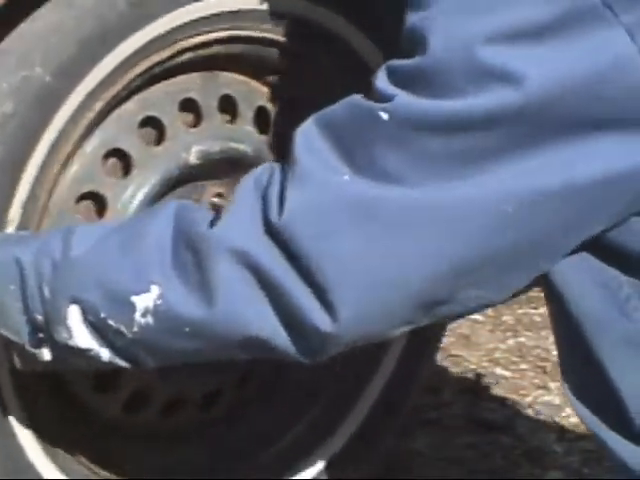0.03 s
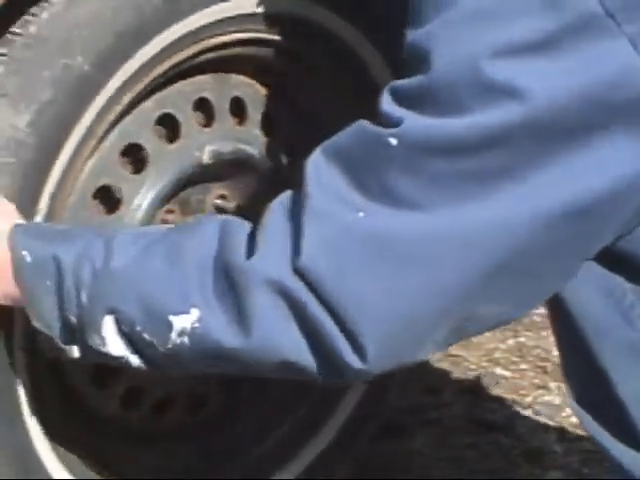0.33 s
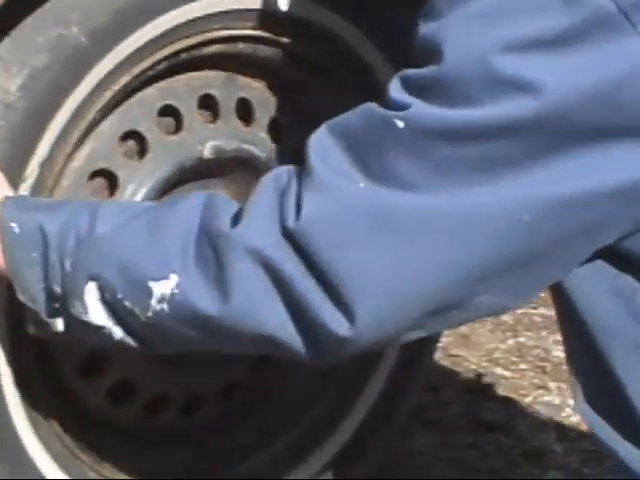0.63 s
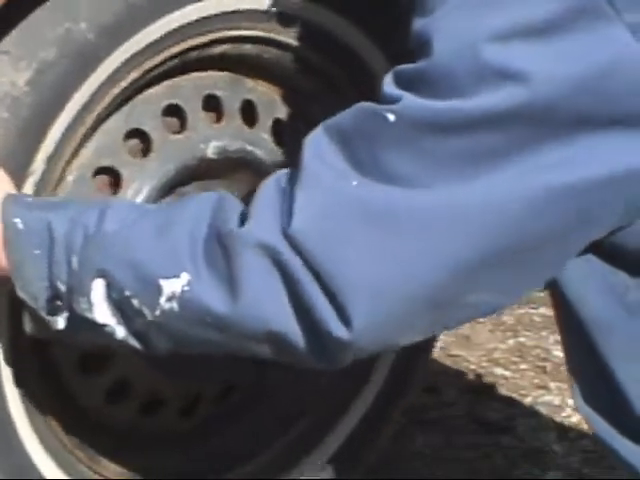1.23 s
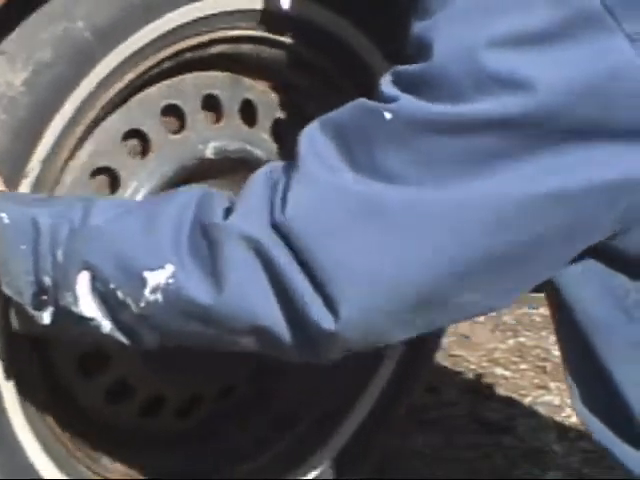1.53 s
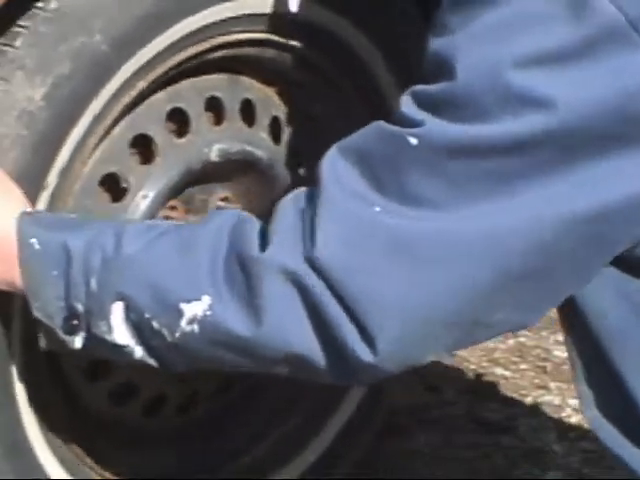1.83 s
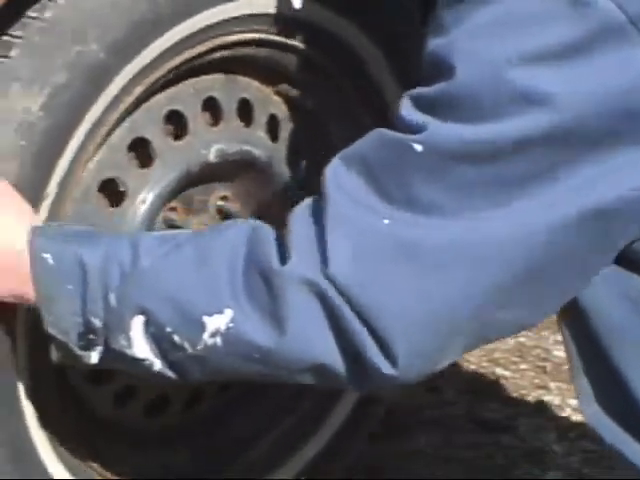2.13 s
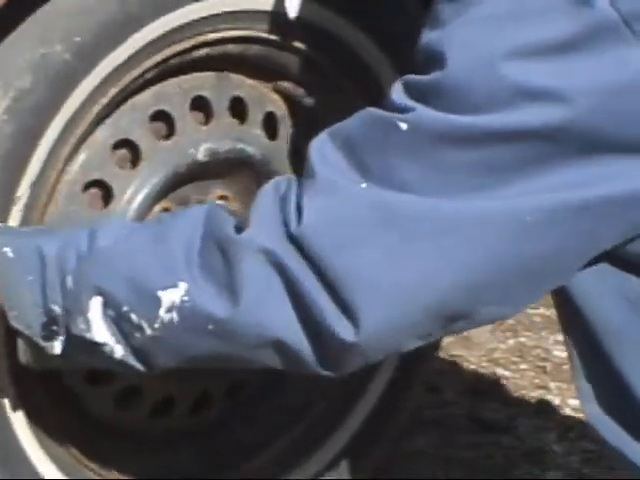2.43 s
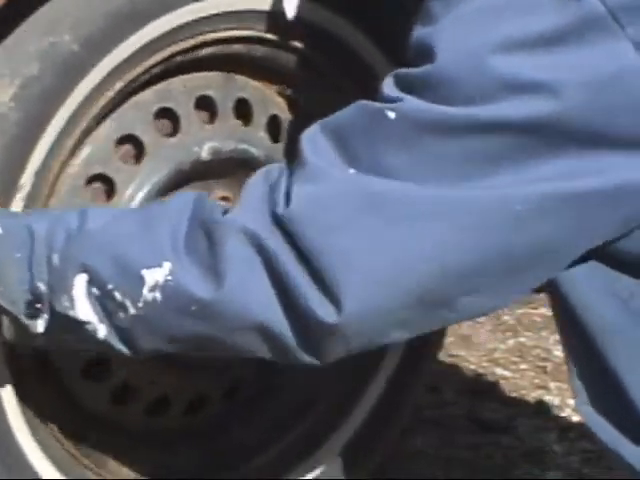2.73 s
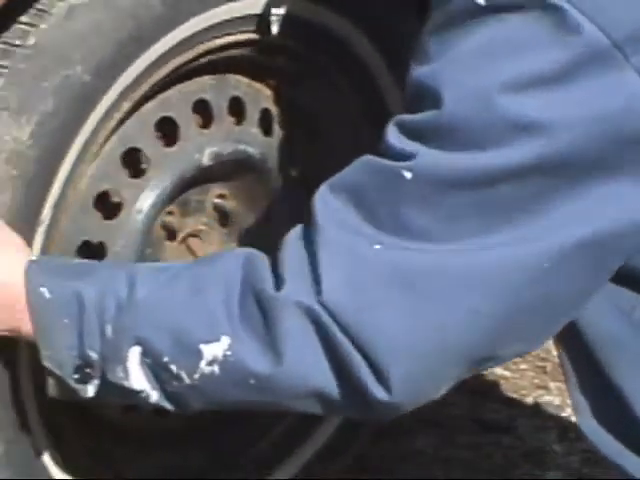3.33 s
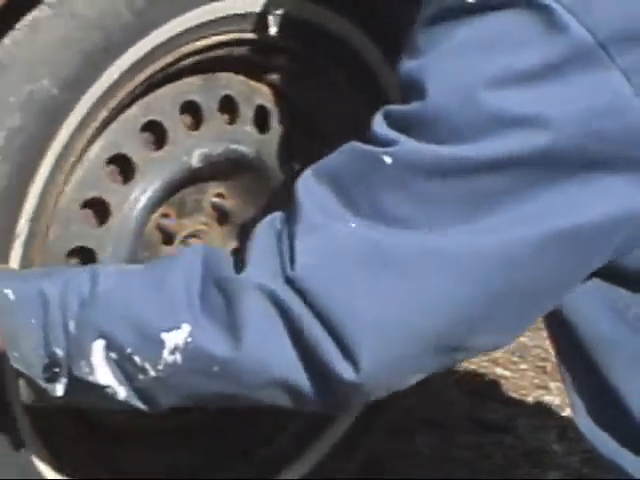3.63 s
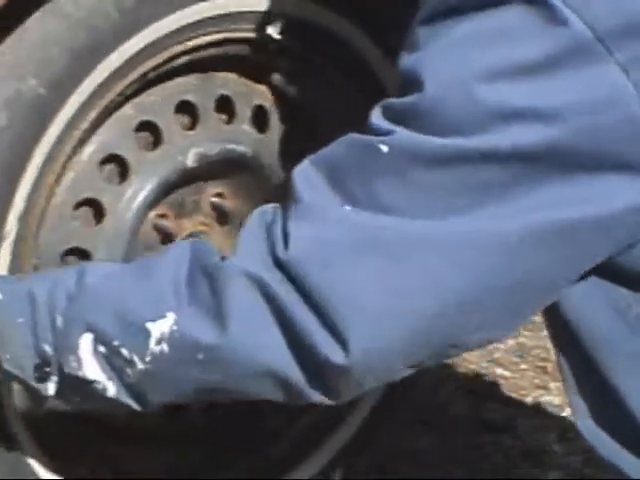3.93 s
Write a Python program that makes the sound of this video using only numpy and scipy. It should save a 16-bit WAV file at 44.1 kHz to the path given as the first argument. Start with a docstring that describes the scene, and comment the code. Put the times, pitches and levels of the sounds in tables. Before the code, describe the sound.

Close metallic clanks come from a wrench worked back and forth on a car wheel. After an opening clank and a quieter moment with soft bumps, hard strokes alternate with lighter return taps above a quiet outdoor rumble.

```python
"""A steel wrench is worked back and forth on the nuts of a car wheel, close by, over an outdoor rumble.
First it taps as it takes up its slack, then clanks home: steel clashes, the tyre thuds, the wheel rings.
A quieter moment follows, with soft bumps and the rub of a sleeve. After about a second the clanks come
hard and often, up to the end, and a loose nut pings on some return strokes. The car and the yard
scatter each blow, and the hardest blows overload the recorder."""
import sys
import numpy as np
from scipy import signal
from scipy.fft import rfft, irfft
from scipy.io import wavfile
from scipy.ndimage import map_coordinates

SR = 44100
rng = np.random.default_rng(int(sys.argv[2]) if len(sys.argv) > 2 else 0)


def bounce(signal):
    """Save signal as a 16-bit WAV file at the path given by the first command-line argument."""
    frames = np.transpose(np.atleast_2d(signal))
    limited = np.clip(frames, -1, 1)
    pcm = np.round(limited * 32767).astype(np.int16)
    wavfile.write(sys.argv[1], SR, pcm)


N = 176400
AGE = np.arange(int(.7 * SR)) / SR  # seconds since a blow began


# Each row: start in seconds, wrench level in dB, wrench pitch in Hz, then clash, thud and wheel in dB.
CLANK_HITS = [(0.062, -6, 1640, -11.5, -25.5, -48), (0.079, -12, 1573, -13, -29.5, -55),
              (0.684, -16.5, 1728, -17.5, -28, -53), (1.1725, 0, 1621, -3.5, -24.5, -40.5),
              (1.435, -7.5, 1667, -17, -22.5, -50), (1.618, -17.5, 1557, -12, -20.5, -46.5),
              (1.825, 0.5, 1713, -7.5, -17, -42.5), (2.028, -20, 1660, -11.5, -23, -40),
              (2.036, -23, 1620, -16, -25, -49), (2.239, 0, 1621, -6.5, -17.5, -40.5),
              (2.396, 0.5, 1599, -7.5, -26, -56), (2.409, -6.5, 1652, -7.5, -22, -37),
              (2.416, -8, 1574, -21, -27.5, -46), (2.65, -0.5, 1626, -6.5, -14.5, -57),
              (2.804, -11, 1567, -8.5, -21, -42), (3.02, 1, 1688, -7.5, -16, -41),
              (3.196, -9.5, 1618, -11, -23, -44.5), (3.405, 1.5, 1634, -7, -14, -38.5),
              (3.414, -3.5, 1698, -8, -23, -60), (3.585, 1, 1612, -5, -17.5, -70),
              (3.609, -21, 1700, -12.5, -30, -36.5), (3.794, -2, 1623, -9.5, -16.5, -66),
              (3.801, 1.5, 1665, -6.5, -19.5, -36), (3.965, 1.5, 1622, -6, -19, -40),
              (3.991, -9, 1580, -17, -19, -45)]

def clanks(graze_lead_s=.0045, graze_db=-16):
    """The wrench slams home and shakes the socket, tyre and wheel; the socket grazes the nut just before."""
    out = np.zeros(N)
    for start, wrench_db, hz, clash_db, thud_db, wheel_db in CLANK_HITS:
        add(out, undb(clash_db + graze_db) * clash(), start - graze_lead_s)
        add(out, undb(wrench_db) * wrench(hz), start)
        contact = clash() + undb(-19) * squeak() + undb(-20.5) * rebounds()
        add(out, undb(clash_db) * contact, start)
        add(out, undb(thud_db) * knock(), start)
        add(out, undb(wheel_db) * wheel(), start)
    return out


# Each row: start in seconds, level in dB, wrench pitch in Hz.
TAP_HITS = [(0.05, -4.5, 1670), (0.074, -3, 1644), (0.089, -12, 1620), (0.954, -29, 1627),
            (0.974, -31.5, 1550), (1.156, -1.5, 1601), (1.595, -9.5, 1630), (1.63, -15, 1630),
            (1.838, -15, 1744), (2.004, -8.5, 1637), (2.61, -19.5, 1585), (2.622, -18, 1690),
            (2.635, -24.5, 1567), (2.782, -18.5, 1540), (2.831, -18.5, 1583), (3.171, -18, 1612),
            (3.225, -15.5, 1632), (3.556, -12.5, 1603)]

def taps():
    """The wrench taps lightly as it takes up its slack."""
    out = np.zeros(N)
    for start, db, hz in TAP_HITS:
        contact = undb(-15) * clash() + undb(-25.5) * squeak()
        tap = wrench(hz) + contact + undb(-28) * knock()
        add(out, undb(db) * tap, start)
    return out


# The wrench's tones. Each row: multiple of its pitch, level in dB, fade time in seconds.
WRENCH_TONES = [(.83, -16.5, 0.094), (.93, -12, 0.088), (.965, 2, 0.038), (1.03, 3, 0.052),
                (1.1, -19, 0.064), (1.59, -13, 0.02), (1.635, -37, 0.02), (3.02, -16, 0.012)]

def wrench(hz, rise_s=.005):
    """The struck wrench bends and rings; tones close in pitch make the sound waver."""
    swell = 1 - np.exp(-(AGE / rise_s) ** 2)
    return ring(WRENCH_TONES, hz, scatter_db=1.2, detune=.006) * swell


# Where clashing steel rings. Each row: pitch in Hz, width in Hz, level in dB.
CLASH_BANDS = [(570, 1100, -10), (1003, 44, -6), (1405, 224, 4.5), (1622, 78, 11), (1828, 131, 8),
               (2643, 101, 11), (2907, 76, 5.5), (3200, 300, -4), (3776, 81, 4), (4020, 190, -1),
               (4858, 197, 0), (5107, 275, -0.5), (5500, 2900, -15.5), (8330, 320, -17.5),
               (13400, 12000, -23.5)]

def clash(scatter_db=2):
    """Steel hits steel; each contact lands somewhere else and brings out other pitches."""
    bands = [(hz, width, db + scatter_db * rng.standard_normal()) for hz, width, db in CLASH_BANDS]
    return chatter(bands, fade_s=.046)


# The socket's squeaks. Each entry: pitch in Hz.
SQUEAK_HZ = [9480, 10420, 13770, 14780]
# One row for each pitch above. Each row: width in Hz, level in dB.
SQUEAK_BANDS = [(170, -2.5), (131, 2.5), (120, 3), (170, -0.5)]

def squeak():
    """The socket, the cup that grips the nut, gives a thin, high ring."""
    bands = [(hz, width, db) for hz, (width, db) in zip(SQUEAK_HZ, SQUEAK_BANDS)]
    return chatter(bands, fade_s=.057)


def rebounds(count=3, min_gap_s=.0073, spread_s=.013):
    """The loose socket rattles on its nut after a clank, each contact weaker than the last."""
    out = np.zeros(N)
    gaps = min_gap_s + spread_s * rng.random(count)
    for k, delay in enumerate(np.cumsum(gaps)):
        add(out, clash() / (k + 1), delay)
    return out[:len(AGE)]


# The wheel disc's broad knock. Each row: pitch in Hz, width in Hz, level in dB.
DISC_BANDS = [(204, 64, 3.5), (324, 190, -5.5), (680, 1900, -12), (963, 98, -5.5)]

def knock():
    """The tyre thuds under the rough knock of the wheel disc."""
    return tyre() + undb(-4.5) * chatter(DISC_BANDS, fade_s=.19)


# The tyre's tones. Each row: pitch in Hz (played 1% lower), level in dB, fade time in seconds.
TYRE_TONES = [(123.5, -20, 0.38), (161.5, -6.5, 0.42), (180, -8, 0.27), (210.5, -7, 0.25),
              (236.6, -9.5, 0.25), (303.6, -9, 0.18), (349.7, -12, 0.08)]

def tyre(rise_s=.0016):
    """The shaken tyre gives a dull thud made of low tones."""
    swell = 1 - np.exp(-AGE / rise_s)
    return ring(TYRE_TONES, pitch=.99, scatter_db=3, detune=.022) * swell


# The wheel's tones. Each entry: pitch in Hz.
WHEEL_TONE_HZ = [1735, 2625, 3525, 4699, 5450]
# One row for each pitch above. Each row: level in dB, fade time in seconds.
WHEEL_TONES = [(11, 0.28), (-14, 0.44), (3, 0.49), (-0.5, 0.36), (2.5, 0.15)]

def wheel():
    """The steel wheel rings on after a clank."""
    tones = [(hz, db, fade_s) for hz, (db, fade_s) in zip(WHEEL_TONE_HZ, WHEEL_TONES)]
    return ring(tones, scatter_db=2.5)


# Each row: start in seconds, level in dB.
PING_HITS = [(1.62, -27.5), (2.804, -29), (3.195, -32)]

def nut_pings(hz=4027, fade_s=.18):
    """A loose nut pings with one clear tone on some return strokes."""
    out = np.zeros(N)
    for start, db in PING_HITS:
        add(out, ring([(hz, db, fade_s)]), start)
    return out


# Each row: start in seconds, level in dB, pitch in Hz.
SOCKET_SCRAPES = [(0.04, -24, 1306), (0.049, -20, 2700), (2.389, -20, 1380), (2.393, -17, 2630),
                  (2.614, -31, 2600), (2.898, -32, 1684), (2.905, -34, 780)]

def scrapes(width_ratio=.072):
    """The socket scrapes briefly as it shifts on its nut."""
    out = np.zeros(N)
    for start, db, hz in SOCKET_SCRAPES:
        add(out, undb(db) * chatter([(hz, width_ratio * hz, 0)], fade_s=.05), start)
    return out


# Each row: start in seconds, level in dB.
TYRE_BUMPS = [(0.094, -24.5), (.356, -29.5), (0.694, -33.5), (.965, -27), (1.237, -29), (1.493, -26.5),
              (2.483, -25), (3.247, -26)]

def bumps(rise_s=.0054):
    """The tyre is bumped softly, so its thud starts more gently."""
    out = np.zeros(N)
    swell = 1 - np.exp(-AGE / rise_s)
    for start, db in TYRE_BUMPS:
        add(out, undb(db) * tyre() * swell, start)
    return out


# The echo's tone colour. Each row: frequency in Hz, level in dB.
ECHO_COLOUR = [(60, -55), (170, -10), (350, 6.5), (800, -1.5), (1700, -5), (3000, -10.5), (6000, -4.5),
               (15000, -4)]

def yard_echo(sound, delay_s=.0013, build_s=.01):
    """Sound bounces off the car, the ground and nearby walls and blurs into a short echo."""
    build = 1 - np.exp(-np.maximum(AGE - delay_s, 0) / build_s)
    tail = rng.standard_normal(len(AGE)) * fade(fade_s=.3) * build
    tail /= np.linalg.norm(tail)
    size = 2 * len(AGE)
    gain = colour(ECHO_COLOUR, np.fft.rfftfreq(size, 1 / SR))
    tail = irfft(rfft(tail, size) * gain)[:len(AGE)]
    return undb(-14.5) * signal.fftconvolve(sound, tail)[:N]


# Each row: time in seconds, rasp level in dB, hiss level in dB, number that multiplies both pitches.
SLEEVE_PATH = [(0.761, -61, -67, 1.09), (1.0, -49, -55, 0.96), (1.13, -52, -59, 1.02),
               (1.4, -62, -55, 1.08), (1.6, -71, -71, 1.2)]

def sleeve():
    """A sleeve rubs on the tyre with a faint rasp and hiss that slide in pitch."""
    times, *columns = np.array(SLEEVE_PATH).T
    rasp_db, hiss_db, pitch = (np.interp(np.arange(N) / SR, times, column) for column in columns)
    out = np.zeros(N)
    for db, base_hz, width_hz in [(rasp_db, 2820, 210), (hiss_db, 4850, 560)]:
        rub = band_noise([(base_hz, width_hz, 0)], N)
        out += undb(db) * map_coordinates(rub, [np.cumsum(pitch)], mode="wrap")  # faster sounds higher
    return out


# The rumble's tone colour. Each row: frequency in Hz, level in dB.
RUMBLE_COLOUR = [(15, -33), (25, -3.5), (173, 6.5), (340, -1), (378, -3), (457, -2.5), (614, -2.5),
                 (1240, -5.5), (2630, -11.5), (2920, -14), (3930, -14.5), (7700, -19), (15500, -24)]

def rumble():
    """The outdoors hums along as a quiet, steady, low noise."""
    gain = colour(RUMBLE_COLOUR, np.fft.rfftfreq(N, 1 / SR))
    return undb(-44.5) * noise(gain, N)


def ring(tones, pitch=1, scatter_db=0, detune=0):
    """A struck object's fading tones; scatter_db varies their level and detune their pitch."""
    out = np.zeros(len(AGE))
    for k, (frequency, db, fade_s) in enumerate(tones):
        level = undb(db + scatter_db * rng.standard_normal())
        hz = frequency * pitch * (1 + detune * rng.standard_normal())
        out += (-1) ** k * level * fade(fade_s) * np.sin(2 * np.pi * hz * AGE)  # every other tone flips
    return out


def chatter(bands, fade_s, rise_s=.004):
    """Steel faces grind together for an instant and leave a short, noisy ring."""
    swell = np.minimum(AGE / rise_s, 1) ** 1.5
    decay = np.exp(-np.log(1000) * np.maximum(AGE - rise_s, 0) / fade_s)
    return band_noise(bands, len(AGE)) * swell * decay


def band_noise(bands, size):
    """Noise that is strongest around each band's pitch."""
    hz = np.fft.rfftfreq(size, 1 / SR)
    power = sum(undb(db) ** 2 / (1 + 2 * ((hz - centre) / width) ** 2) ** 2 for centre, width, db in bands)
    return noise(np.sqrt(power), size)


def noise(gain, size):
    """Noise of standard strength; gain sets the balance of its frequencies."""
    wave = irfft(gain * np.exp(2j * np.pi * rng.random(len(gain))), size)
    return wave / wave.std()


def colour(points, hz):
    """Join the points of a tone colour to get a gain at each frequency."""
    point_hz, db = np.array(points).T
    return undb(np.interp(np.log(hz + 1), np.log(point_hz), db))


def fade(fade_s):
    """Die away, dropping 60 dB over the fade time."""
    return np.exp(-np.log(1000) * AGE / fade_s)


def undb(db):
    """Turn decibels into a gain, a number to multiply a sound by."""
    return 10 ** (np.asarray(db) / 20)


def add(out, sound, start):
    """Mix a sound in at its start time in seconds."""
    i = max(int(start * SR), 0)
    out[i:i + len(sound)] += sound[:max(N - i, 0)]


def scene():
    """The work on the wheel, its echo and the background, in one channel."""
    near = taps() + clanks() + nut_pings() + scrapes() + bumps()
    return (near + yard_echo(near) + sleeve() + rumble())[None]


def record(dry, drive_db=2.5, low_cut_hz=44, top_hz=15750):
    """The recorder clips the hardest blows and cuts the deepest bass and the highest treble."""
    clipped = np.clip(undb(drive_db) * dry, -1, 1)
    bass_cut = signal.butter(1, low_cut_hz, "high", fs=SR, output="sos")
    treble_cut = signal.ellip(12, .1, 85, top_hz, fs=SR, output="sos")
    return signal.sosfilt(treble_cut, signal.sosfilt(bass_cut, clipped))


dry = scene()
out = record(dry)
bounce(out)
```